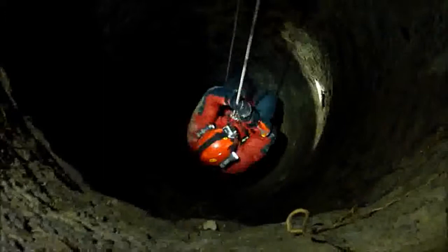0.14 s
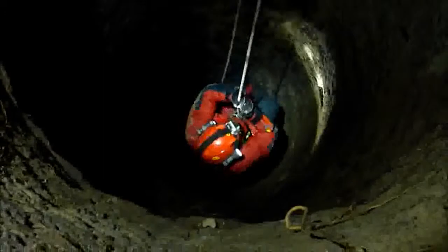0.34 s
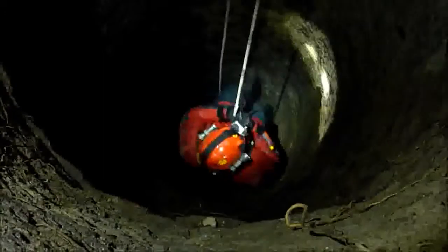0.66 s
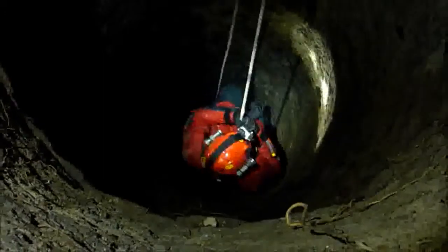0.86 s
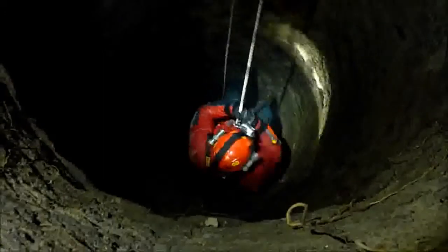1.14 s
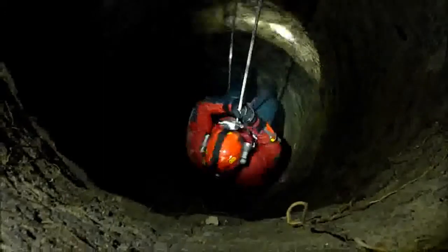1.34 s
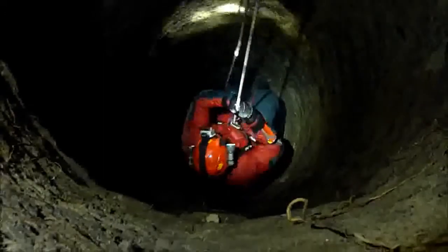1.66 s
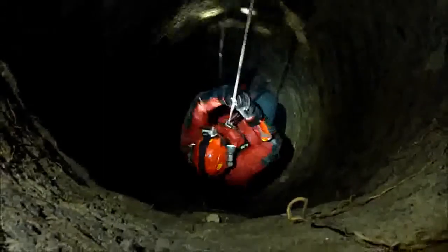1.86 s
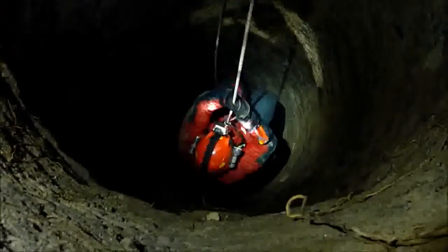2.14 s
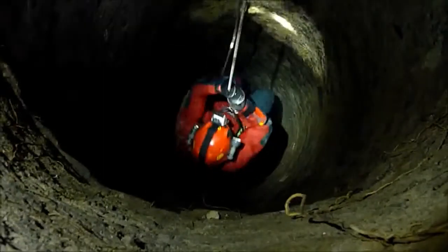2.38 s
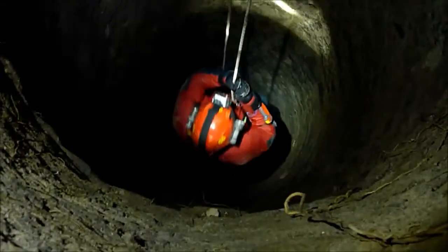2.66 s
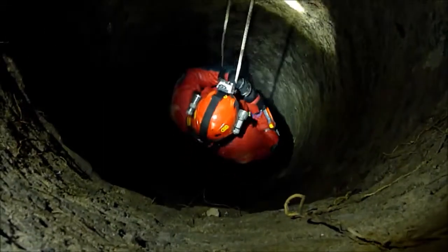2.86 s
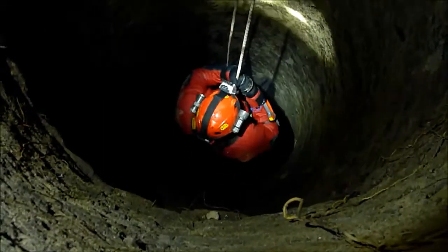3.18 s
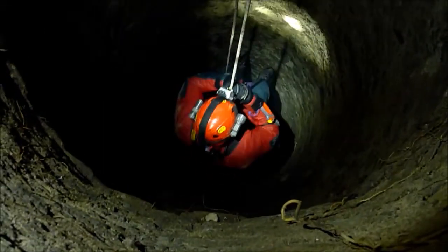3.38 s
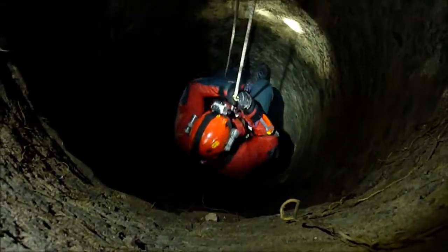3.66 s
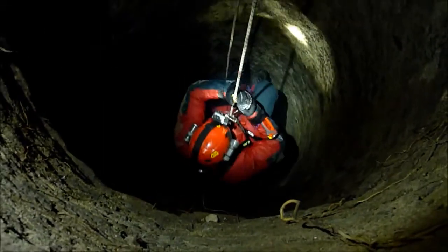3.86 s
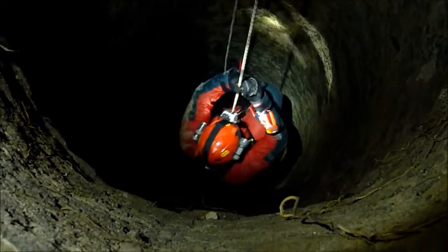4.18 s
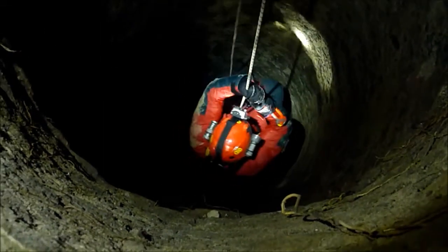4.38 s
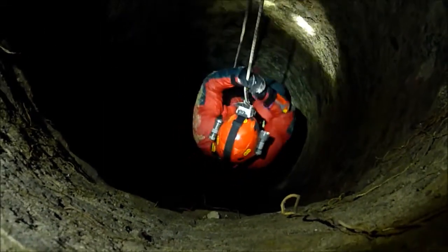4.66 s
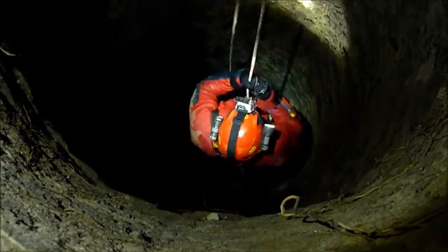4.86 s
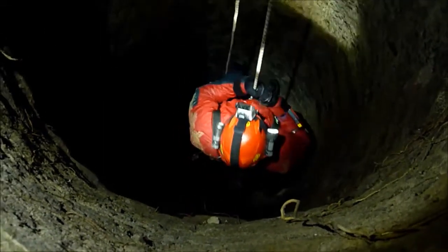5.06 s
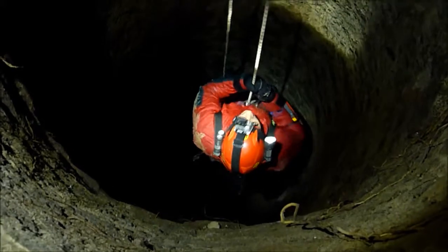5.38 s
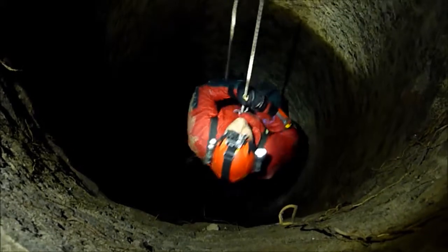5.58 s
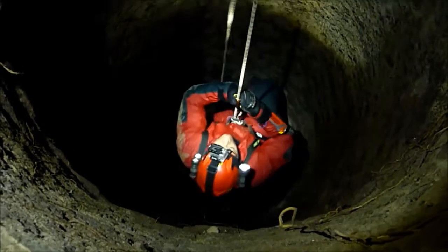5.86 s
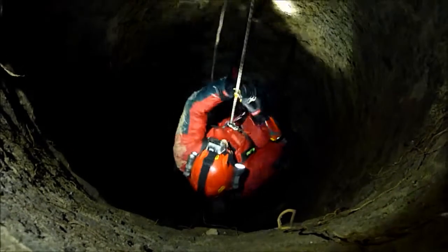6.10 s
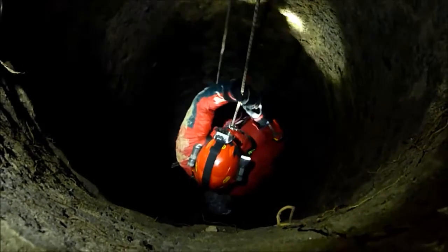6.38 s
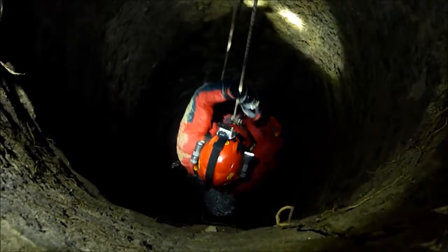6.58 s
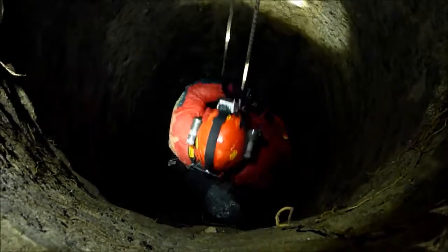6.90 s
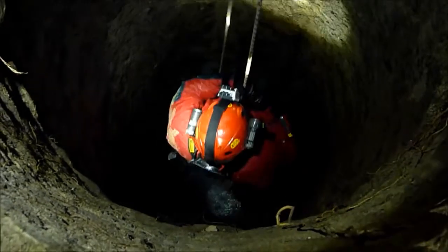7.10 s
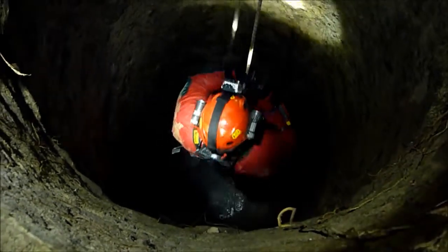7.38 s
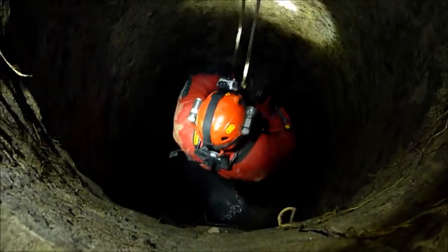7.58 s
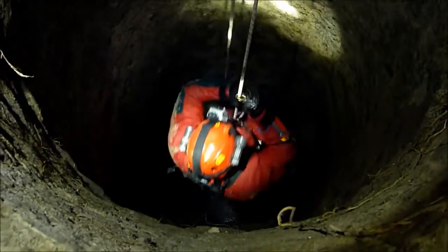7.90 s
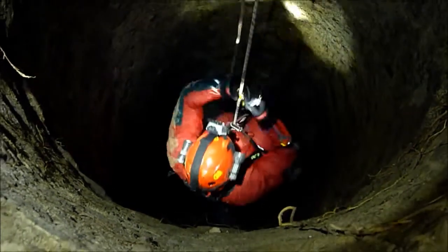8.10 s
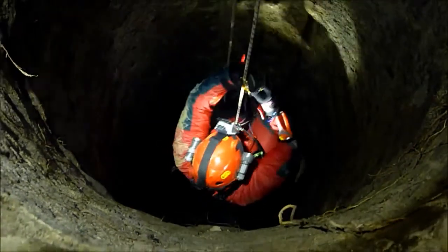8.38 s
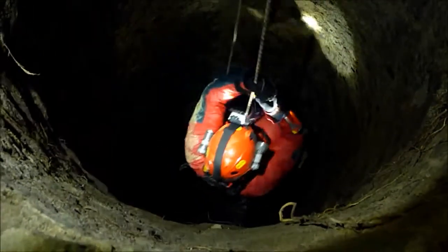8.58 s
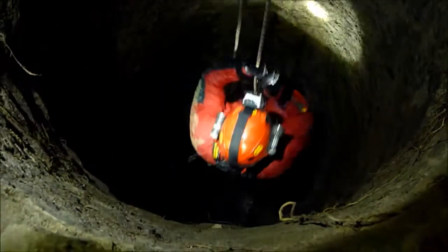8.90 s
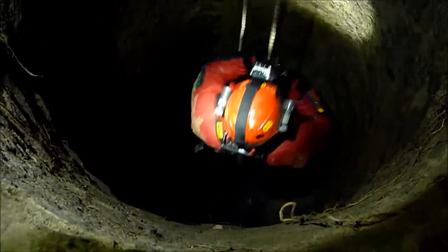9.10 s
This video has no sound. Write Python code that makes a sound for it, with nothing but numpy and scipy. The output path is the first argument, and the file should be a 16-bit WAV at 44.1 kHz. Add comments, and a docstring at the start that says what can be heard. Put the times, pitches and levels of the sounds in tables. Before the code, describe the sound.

A climber works up a rope in a narrow stone shaft, just below the microphone. Cams and buckles snap irregularly, steel links clink brightly, and a coated suit rustles against scraping rope. A heavy dull bump comes early, followed by two sharp clinks; later, gritty rope rasps cluster around the middle. Short hollow stone echoes follow each hit, over soft hiss and a faint very high whine.

```python
"""Rope climb in a stone shaft

A climber works up a rope in a narrow stone shaft, below a camera with one microphone.
Shaped noise makes the suit's rustle, the rope's scrape and slips, the snapping cams and the wall bumps;
decaying sine modes make the clinking links, and a two-partial tone makes one pulley chirp.
Sparse echoes smear every hit, over a soft hiss and a faint, very high whine.
"""
import sys
import numpy as np
from scipy import signal
from scipy.fft import rfft, irfft, next_fast_len
from scipy.io import wavfile
from scipy.ndimage import uniform_filter1d

SR = 44100
rng = np.random.default_rng(int(sys.argv[2]) if len(sys.argv) > 2 else 0)


def to_wav(sig):
    """Store sig (one row per channel, or 1-D mono) as 16-bit WAV at the path in sys.argv[1].

    Samples outside -1..1 are clipped; the rate is SR.
    """
    pcm = np.clip(np.atleast_2d(sig), -1, 1) * 32767
    pcm = np.round(pcm).astype(np.int16)
    wavfile.write(sys.argv[1], SR, pcm.T)  # frames by channels


N = 407925
T = np.arange(N) / SR

# Movement of the body. Each row: time in seconds, suit rustle in dB, rope and webbing scrape in dB.
BODY_MOVES = [(0.0, -48.5, -48), (0.12, -51.5, -47.5), (0.4, -45.5, -43), (0.68, -45.5, -40.5),
              (0.81, -53, -59), (0.95, -53.5, -46.5), (1.13, -51.5, -47), (1.48, -55.5, -51),
              (1.57, -46, -46), (2.2, -49.5, -47.5), (2.4, -50, -48), (2.76, -50, -44),
              (2.88, -53.5, -48.5), (3.17, -53, -49), (3.48, -50.5, -48.5), (4.07, -46, -42),
              (4.17, -51.5, -48.5), (4.55, -51.5, -48), (4.9, -46.5, -39.5), (5.1, -49.5, -44),
              (5.18, -55.5, -53), (5.54, -47.5, -45.5), (5.75, -50, -48), (5.9, -42.5, -48),
              (6.05, -43.5, -51), (6.3, -51, -49), (6.7, -50, -44.5), (6.95, -46.5, -39.5),
              (7.15, -55, -51), (7.28, -56, -50), (7.37, -49.5, -45), (7.75, -53.5, -51), (8.1, -47, -44),
              (8.27, -44.5, -45.5), (8.45, -54.5, -50.5), (8.7, -51.5, -48.5), (9.25, -45, -41.5)]


def gain_of(db):
    """Turns decibels into an amplitude factor."""
    return 10 ** (np.asarray(db) / 20)


def evened(x):
    """Scales a signal to an rms of 1."""
    return x / np.sqrt(np.mean(x ** 2) + 1e-20)


def colour(x, points):
    """Filters by a spectrum of (Hz, dB) points, joined along a logarithmic frequency axis."""
    size = next_fast_len(len(x) + 4096)
    f, db = np.transpose(points)
    hz = np.fft.rfftfreq(size, 1 / SR)
    gain = gain_of(np.interp(np.log(hz + 1), np.log(f + 1), db))
    return irfft(rfft(x, size) * gain, size)[:len(x)]


def add(mix, s, sound):
    """Mixes a sound in, starting at s seconds."""
    part = mix[round(s * SR):][:len(sound)]
    part += sound[:len(part)]


def grains(count, spread_db):
    """Noise whose samples differ widely in size: tiny catches of fibre on fibre."""
    size_db = spread_db * np.minimum(rng.exponential(1, count), 5)
    return evened(rng.standard_normal(count) * gain_of(size_db))


def flutter(seconds, depth_db):
    """Random loudness that changes over the given time."""
    drift = uniform_filter1d(rng.standard_normal(N), max(round(seconds * SR), 2))
    return gain_of(depth_db * evened(drift))


def patches(x, depth_db, frames, bins):
    """Makes the loudness drift unevenly over time and pitch."""
    z = signal.stft(x, nperseg=512)[2]
    across_pitch = uniform_filter1d(rng.standard_normal(z.shape), bins, 0)
    field = evened(uniform_filter1d(across_pitch, frames, 1))
    return signal.istft(z * gain_of(depth_db * field), nperseg=512)[1][:len(x)]


def burst(spread, t60, tail_db, rise):
    """A blow arrives off the near walls for a moment, then only its decaying tail is left."""
    t = np.arange(round(.3 * SR)) / SR
    early = np.clip((rise + spread - t) / 0.005, 0, 1) * gain_of(-450 * t)
    tail = gain_of(tail_db - 60 * t / t60)
    return np.minimum(t / rise, 1) * (early + tail) * rng.standard_normal(len(t))


def hiss():
    """Preamp hiss: steady noise that darkens toward the top."""
    # Each row: frequency in Hz, relative level in dB.
    hiss_colour = [(25, -14.5), (100, -6.5), (200, -2.5), (2000, 1), (7000, -8.5), (8000, -28),
                   (12000, -60)]
    return gain_of(-62) * evened(colour(rng.standard_normal(N), hiss_colour))


def whine():
    """A thin, very high steady sine, faint, with level set by a curve and a slight random flutter."""
    whine_hz = 15625
    # Each row: time in seconds, rms level in dB before the flutter.
    whine_levels = [(0.0, -63), (1.1, -65), (1.9, -63), (2.5, -69), (2.6, -88), (3.0, -64), (5.45, -63),
                    (5.79, -71), (6.1, -63.5), (6.4, -73), (6.72, -65), (6.93, -76), (7.35, -65),
                    (9.25, -64)]
    s, db = np.transpose(whine_levels)
    level = np.sqrt(2) * gain_of(np.interp(T, s, db))
    return level * flutter(.08, 1.3) * np.sin(2 * np.pi * whine_hz * T)


def shaft(x):
    """Late sound of the shaft: sparse echoes of random sign, the treble dying first."""
    echoes_per_s, first_echo_s = 2500, .012
    low_t60, high_t60 = 0.44, 0.16  # s
    t = np.arange(SR // 2) / SR
    signs = rng.choice([-1., 1.], len(t))
    taps = signs * (rng.random(len(t)) < echoes_per_s / SR) * (t > first_echo_s)
    low = colour(taps, [(800, -2.0), (2500, -21.5)])
    tail = low * gain_of(-60 * t / low_t60) + (taps - low) * gain_of(-60 * t / high_t60)
    return signal.oaconvolve(x, tail / np.linalg.norm(tail))[:N]


def shaft_boom():
    """The shaft's hollow low resonance swells with the suit's rustle, more steeply than it."""
    boom_db, middling_db = -58.5, -49.5  # boom level at a middling rustle
    slope = 1.26  # dB of boom per dB of rustle
    s, suit_db, _ = np.transpose(BODY_MOVES)
    level_db = boom_db + slope * (suit_db - middling_db)
    resonance = [(330, -24), (400, -6.5), (450, -1.5), (510, -4.5), (620, -27)]
    boom = evened(colour(rng.standard_normal(N), resonance) * flutter(0.06, 3.2))
    return gain_of(np.interp(T, s, level_db)) * boom


def suit_rustle():
    """Coated cloth rubs on itself in a low, patchy, grainy rustle."""
    # Each row: frequency in Hz, relative level in dB.
    suit_colour = [(120, -31), (200, -12.5), (330, -7.5), (600, -1), (850, 0.5), (1500, -3.5), (2500, -3.5),
                   (5000, -40), (9000, -44.5)]
    s, suit_db, _ = np.transpose(BODY_MOVES)
    cloth = patches(colour(grains(N, 2.9), suit_colour), depth_db=2.5, frames=8, bins=3)
    return gain_of(np.interp(T, s, suit_db)) * evened(cloth * flutter(0.04, 0.85))


def rope_scrape():
    """Rope and webbing rub in a brighter, grainy scrape."""
    # Each row: frequency in Hz, relative level in dB.
    rope_colour = [(500, -26.5), (1500, -11), (2500, -9), (3600, -3.5), (5000, -9), (7000, -13),
                   (15000, -10)]
    s, _, rope_db = np.transpose(BODY_MOVES)
    fibre = patches(colour(grains(N, 2.15), rope_colour), depth_db=2.0, frames=5, bins=8)
    return gain_of(np.interp(T, s, rope_db)) * evened(fibre * flutter(0.05, 1.16))


def squeak():
    """A pulley chirps: a short stick-slip tone with its octave."""
    # One row: start in seconds, level of the lower tone in dB, its frequency in Hz,
    # length in seconds, octave in dB relative to the lower tone.
    chirp = (6.636, -37, 1860, .016, 6)
    s, db, hz, length, octave_db = chirp
    t, out = np.arange(0, .05, 1 / SR), np.zeros(N)
    tone = np.sin(2 * np.pi * hz * t) + gain_of(octave_db) * np.sin(2 * np.pi * 2 * hz * t)
    swell = np.sin(np.pi * np.minimum(t / length, 1)) ** 2.3
    add(out, s, gain_of(db) * tone * swell)
    return out


def bumps():
    """Boots and bag bump the wall: dull knocks of noise that rumble on in the shaft."""
    # Each row: time in seconds, approximate peak in dB, centre in Hz, rumble t60 in seconds,
    # bass in dB relative to the centre.
    wall_bumps = [(.22, -38, 450, .4, -22), (.361, -30.5, 500, .5, -29), (.689, -13, 563, 0.23, -7),
                  (1.56, -37.5, 450, 0.28, -20), (1.81, -34, 450, 0.45, -21), (2.028, -35, 430, 0.26, -22),
                  (2.733, -34, 970, 0.74, -16), (4.621, -35.5, 576, .19, -21), (4.85, -32, 490, 0.17, -24),
                  (5.859, -31, 515, 0.28, -38), (6.02, -34, 470, .3, -27), (6.875, -32, 400, .25, -6),
                  (6.977, -35, 947, 0.39, -4), (7.311, -32.5, 472, .14, -22),
                  (8.441, -33.5, 1090, .26, -12)]
    out = np.zeros(N)
    for s, db, hz, t60, bass_db in wall_bumps:
        shape = [(hz / 6, bass_db - 13), (hz / 3, bass_db), (hz / 2, bass_db / 2),
                 (hz, 0), (hz * 2, -6), (hz * 4, -18)]
        knock = colour(burst(spread=.014, t60=t60, tail_db=0.0, rise=0.0012), shape)
        onset_rms = np.sqrt(np.mean(knock[:round(.01 * SR)] ** 2))
        # the table gives peaks, which stand above the rms
        add(out, s + 0.000955, gain_of(db - 7.5) * knock / onset_rms)
    return out


def slips():
    """Rope strands catch on the teeth of a clamp in a swelling, gritty rasp."""
    # Each row: time of the peak in seconds, level in dB, centre in Hz, length in seconds.
    rope_slips = [(0.383, -43, 3970, .033), (1.545, -37, 3520, 0.034), (1.603, -32, 3900, 0.053),
                  (1.739, -39.5, 3840, .04), (1.779, -38.5, 3680, 0.041), (1.863, -38.5, 3760, .038),
                  (1.9, -40.5, 3480, .043), (2.094, -43.5, 2000, .024), (2.782, -46, 2530, .032),
                  (3.964, -43.5, 4300, 0.051), (4.007, -38, 4180, 0.039), (4.663, -39, 3320, 0.038),
                  (4.881, -48.5, 3300, 0.11), (5.897, -27, 3670, 0.059), (5.974, -35.5, 3620, .076),
                  (6.025, -32, 3700, 0.038), (6.069, -30, 3800, 0.019), (7.921, -43, 3500, .043),
                  (8.0, -41.5, 3770, .055), (8.08, -29.5, 3740, .031), (8.175, -39.5, 3850, 0.061),
                  (8.249, -43, 3400, .041), (8.46, -43, 1330, .038)]
    # Clamp body for a 3800 Hz centre. Each row: frequency in Hz, relative level in dB.
    clamp_colour = [(1200, -19), (2300, -10.5), (2900, 2.5), (3800, 5.5), (5200, -0.5), (6000, -8.5),
                    (7500, -9), (11000, -17)]
    rise_share = .48  # share of a slip spent swelling
    out, (f, level_db) = np.zeros(N), np.transpose(clamp_colour)
    t = np.arange(-.12, .12, 1 / SR)
    for s, db, hz, length in rope_slips:
        rise, fall = rise_share * length, (1 - rise_share) * length
        grit = evened(colour(grains(len(t), 4.0), np.c_[f * hz / 3800, level_db]))
        # catches come in clumps about two milliseconds long
        drift = uniform_filter1d(rng.standard_normal(len(t)), size=90)
        clumps = gain_of(1.36 * evened(drift))
        swell = np.exp(-(t / np.where(t < 0, rise, fall)) ** 2)
        add(out, s + t[0], gain_of(db) * evened(grit * clumps) * swell)
    return out


def clinks():
    """A short rattle drives the close, beating modes of a steel link until rope or glove damps it."""
    # Each row: time in seconds, level in dB, extra level of the modes above 4500 Hz in dB.
    link_clinks = [(.338, -29.5, -13), (.353, -26, -18), (.488, -33.5, -7), (.648, -33, -12),
                   (.9086, -14.5, -9), (2.018, -37, -20), (2.444, -37, -10), (2.492, -12.5, -14.5),
                   (2.533, -32, 1.5), (2.659, -37, -15), (2.706, -41, -12), (4.624, -35, -23),
                   (4.774, -41, -13), (4.805, -24.5, -27), (6.255, -38, -17), (6.694, -32, -11),
                   (6.887, -32.5, -16), (6.913, -28, -13), (6.94, -34, -8), (7.198, -43, -19),
                   (8.858, -36.5, -11), (9.036, -29.5, -16), (9.105, -37, -9)]
    # Frequencies of the link's modes in Hz.
    mode_hz = [1625, 2040, 2755, 3180, 3478, 3560, 3648, 4110, 4240, 4610, 4800, 5072, 5400, 5600, 5702,
               6185, 7085, 7530, 9200, 9940]
    # One row for each mode: relative level in dB, t60 in seconds.
    mode_rings = [(-35, 0.11), (-32, .08), (-38, .1), (-37, .08), (4.5, 0.17), (-5.5, 0.25), (-1.5, 0.16),
                  (-9, .06), (-13, 0.081), (-19, .08), (-12, .08), (2.5, 0.12), (-21, .08), (5, 0.12),
                  (-13, .09), (-17, .08), (3, 0.11), (3, 0.11), (-3, 0.13), (-3, 0.11)]
    # a link rings freely for a moment; one struck hard swings clear and rings longer
    free_s, hard_db, free_s_per_db = 0.011, -25.5, .0011
    out, t = np.zeros(N), np.arange(round(.3 * SR)) / SR
    mode_luck = rng.standard_normal((len(link_clinks), len(mode_rings)))
    for (s, db, upper_db), row in zip(link_clinks, mode_luck):
        free = free_s + free_s_per_db * max(db - hard_db, 0)
        rattle = rng.standard_normal(len(t)) * (gain_of(-1300 * t) + .17 * (t < free))
        ring = 0
        for hz, (level_db, t60), luck in zip(mode_hz, mode_rings, row):
            decaying_sine = gain_of(-60 * t / t60) * np.sin(2 * np.pi * hz * t)
            mode = signal.oaconvolve(rattle, decaying_sine)[:len(t)]
            mode_db = level_db + 1.3 * luck + upper_db * (hz > 4500)
            ring = ring + gain_of(mode_db) * mode / abs(mode).max()
        damping_db = -9 * np.clip((t - free) / 0.005, 0, 1)
        clink = colour(ring * gain_of(damping_db), [(600, -26), (1400, -0.5)])
        add(out, s - .001, gain_of(db - 6.5) * clink)
    return out


def snaps():
    """Cams and buckles snap: smeared noise ticks, each coloured by its own small resonances."""
    # Each row: time in seconds, approximate peak in dB, centre in Hz,
    # body and treble settings in dB relative to the centre.
    gear_snaps = [(.182, -33.5, 2470, -14, -18), (.3523, -19.5, 4030, -18, -18),
                  (0.67, -27, 3810, -16, -23), (0.6916, -17.5, 3800, -7, -35), (.9093, -16, 3750, -36, -20),
                  (1.4877, -23.5, 3420, -14, -13.5), (1.5229, -30.5, 2980, -19, -23),
                  (1.7205, -30.5, 3370, -26, -14), (1.8457, -29, 4190, -19, -28),
                  (2.0173, -20.5, 3460, -19, -22), (2.1745, -31, 3700, -11, -18),
                  (2.493, -10.5, 3800, -19, -6), (2.533, -29, 3500, -20, -1), (2.623, -36, 2460, -18, -23),
                  (2.886, -34, 4910, -17, -8), (3.0, -31.5, 3880, -26, -18),
                  (3.6717, -24.5, 3870, -25, -18.5), (4.103, -28.5, 3960, -11, -24),
                  (4.2169, -18.5, 4060, -16, -18.5), (4.6245, -32, 3420, -9, -34),
                  (4.7093, -20.5, 5200, -8.5, -6), (4.806, -29.5, 3460, -21, -11),
                  (5.1662, -20.5, 3430, -25, -16.5), (5.7165, -20, 4240, -17, -14),
                  (5.7437, -28.5, 3970, -19, -26), (5.8157, -30, 3810, -20, -16),
                  (5.8346, -26.5, 3350, -26, -22), (6.1489, -25.5, 3400, -24, -20),
                  (6.1835, -27.5, 3440, -21, -20), (6.2556, -19, 3450, -19, -16.5),
                  (6.4202, -36, 2360, -3, -25), (6.6923, -31.5, 3680, -11, -18),
                  (6.7207, -20, 3320, -13, -8), (6.81, -29, 3600, -13, -16),
                  (6.9137, -24.5, 3340, -12, -16), (7.199, -32.5, 3330, -11, -15),
                  (7.304, -30.5, 4370, -16, -12), (7.312, -30.5, 2510, -15, -32),
                  (7.7984, -27.5, 4090, -16.5, -14), (7.8283, -22, 3970, -20, -20.5),
                  (7.9074, -29.5, 2700, -18, -15), (8.1186, -25.5, 2530, -23, -12),
                  (8.2935, -31.5, 3270, -7, -31), (8.3816, -29, 3550, -14, -26),
                  (8.39, -20, 3670, -13.5, -14.5), (8.6994, -38, 2300, -13, -18),
                  (8.8877, -18, 2920, -17, -8), (8.981, -33.5, 3440, -15, -18)]
    spread_s = 0.017  # how long the near walls smear a snap
    out, small_hz = np.zeros(N), np.geomspace(1000, 9000, num=44)
    resonances = rng.standard_normal((len(gear_snaps), 44))
    for (s, db, hz, body_db, treble_db), row in zip(gear_snaps, resonances):
        below, above = hz * .86, hz * 1.16
        # small parts radiate almost no bass
        shape = [(500, body_db - 31), (1100, body_db + 0.5), (1700, body_db + 6.0),
                 (below, -3.5), (hz, 0), (above, -3.5),
                 (6600, treble_db + 4.5), (12000, treble_db - 2.0)]
        blow = burst(spread_s, t60=.1, tail_db=-8, rise=.0012)
        tick = colour(colour(blow, shape), np.c_[small_hz, 3.3 * row])
        onset_rms = np.sqrt(np.mean(tick[:round(spread_s * SR)] ** 2))
        # the table gives peaks; noise peaks stand well above its rms
        add(out, s - .0015, gain_of(db - 12.0) * tick / onset_rms)
    return out


def scene():
    """All sources share one spot below the camera; only the hits get the shaft's late echoes."""
    hits = snaps() + clinks() + slips() + bumps() + squeak()
    rubbing = suit_rustle() + rope_scrape() + shaft_boom()
    mono = hits + gain_of(-10.5) * shaft(hits) + rubbing
    return np.array([mono, mono])


def record(dry):
    """Sets the overall tone colour, adds the hiss and the whine, then limits the band."""
    # Overall tone colour: weak bass, dull above 7 kHz, with deep gaps near 8 and 12 kHz.
    # Each row: frequency in Hz, gain in dB.
    tone_colour = [(60, -22), (190, 0.5), (6900, 0.5), (7550, -8), (7950, -31), (8250, -16), (10600, -15.5),
                   (11600, -28), (12000, -54), (12900, -26.5), (15200, -28)]
    edge_hz = 16050
    heard = np.array([colour(c, tone_colour) for c in dry]) + whine() + hiss()
    low_pass = signal.firwin(1023, edge_hz, window=("kaiser", 9), fs=SR)
    return signal.oaconvolve(heard, low_pass[None], "same")


dry = scene()
out = record(dry)
to_wav(out)
```